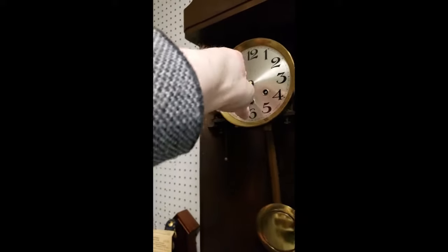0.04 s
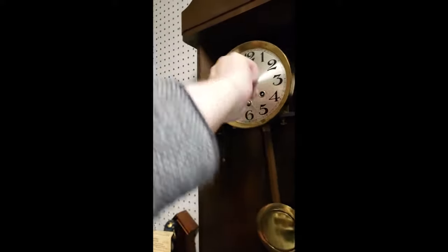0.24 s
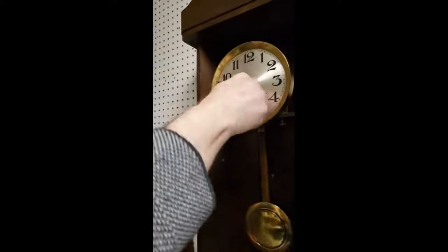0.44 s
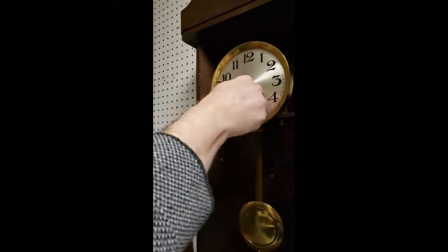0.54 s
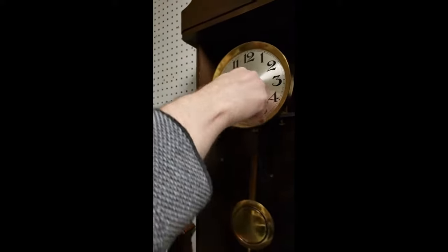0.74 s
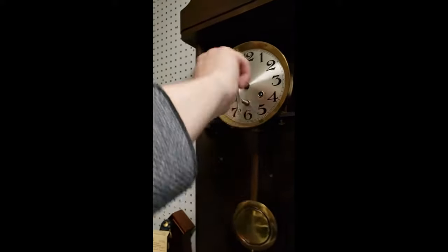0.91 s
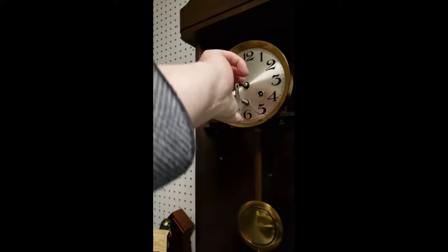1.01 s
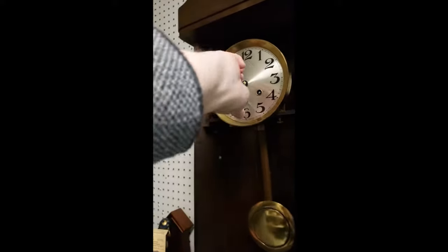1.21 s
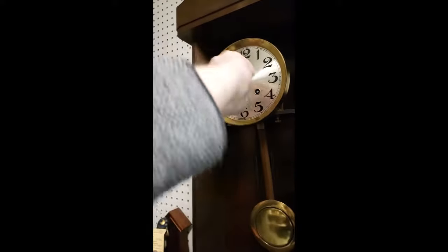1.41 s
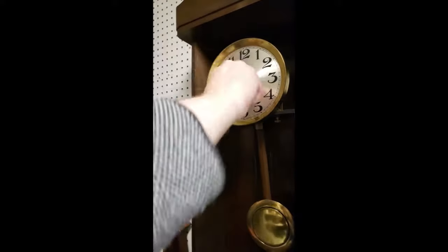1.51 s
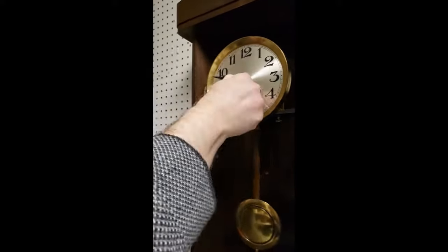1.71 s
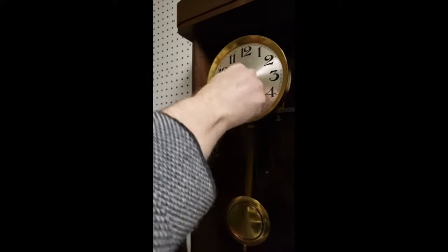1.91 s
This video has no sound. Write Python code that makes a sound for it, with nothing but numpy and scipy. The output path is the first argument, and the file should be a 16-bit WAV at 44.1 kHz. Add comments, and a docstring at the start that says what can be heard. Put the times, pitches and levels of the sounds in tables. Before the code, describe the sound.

Sharp, brassy ratchet clicks come in two quick runs as a key winds a wooden wall clock, nearby on the left in a quiet room. Light key ticks and knocks on the case fill the pause and follow the second turn.

```python
"""A wooden wall clock, to the left in a small quiet room, is wound with two turns of its key.
First the key ticks on its arbor; then the pawl snaps over the ratchet teeth, rattling the brass
movement and sounding the case. In the pause to change grip the key ticks, the spring's load knocks
on the case and the fingers rub round the key. The second turn follows with another run of snaps,
and ends in a few last ticks and knocks."""
import sys
import numpy as np
from scipy import signal
from scipy.fft import rfft, irfft
from scipy.io import wavfile

SR = 44100
rng = np.random.default_rng(int(sys.argv[2]) if len(sys.argv) > 2 else 0)


def materialize(psi):
    """Save the field psi as 16-bit PCM at rate SR to the path in sys.argv[1].

    A 1-D psi becomes a single channel; in a 2-D psi each row is a channel.
    """
    bounded = np.clip(np.atleast_2d(psi).T, -1, 1)
    quanta = np.round(bounded * 32767).astype(np.int16)
    wavfile.write(sys.argv[1], SR, quanta)


N = 85995
TIME = np.arange(N) / SR


def from_db(db):
    """Decibels as an amplitude ratio."""
    return 10 ** (np.asarray(db) / 20)


def unit_energy(x):
    """Normalisation: the squared samples sum to one."""
    return x / np.sqrt(np.sum(x ** 2) + 1e-20)


def at_hz(points, hz, column=1):
    """Interpolation of a table on a log-frequency axis."""
    points = np.array(points)
    return np.interp(np.log(np.maximum(hz, 1)), np.log(points[:, 0]), points[:, column])


def through(x, response):
    """Convolution: a linear system answers each sample with its impulse response."""
    return signal.fftconvolve(x, response)[:N]


def add(track, start_s, sound):
    """Superposition: a sound adds to the track from its start time."""
    start = max(int(start_s * SR), 0)
    track[start:start + len(sound)] += sound[:N - start]


def colour(points, size=4096):
    """Minimum-phase impulse response of unit energy with the given spectrum."""
    gain = from_db(at_hz(points, np.linspace(0, SR / 2, size // 2 + 1)))
    cepstrum = irfft(np.log(gain))
    return unit_energy(irfft(np.exp(rfft(2 * cepstrum[:size // 2], size))))


def ring(modes, scatter_db=0):
    """Free vibration: a sum of damped sinusoids, their levels scattered at random by scatter_db."""
    t = TIME[:SR // 2]
    out = 0
    for k, (hz, db, t60) in enumerate(modes):
        envelope = from_db(db + scatter_db * rng.normal() - 60 * t / t60)
        out += (-1) ** k * envelope * np.sin(2 * np.pi * hz * t)
    return out


def push(soft_s):
    """Force pulse of an impact: the longer the contact, the duller its spectrum."""
    force = TIME[:512] * np.exp(-TIME[:512] / soft_s)
    return force / force.sum()


def chatter(envelope, contacts_per_s=2500, grain_db=-0.5):
    """Tiny contacts of uneven strength merge into noise with the energy of the envelope."""
    size = len(envelope)
    strength = np.interp(TIME[:size] * contacts_per_s, np.arange(size), rng.standard_normal(size))
    burst = envelope * from_db(grain_db * strength) * rng.standard_normal(size)
    return unit_energy(burst) * np.sqrt(np.sum(envelope ** 2))


# Spectrum of the still room. Each row: frequency in Hz, relative level in dB.
AIR_SPECTRUM = [(25, -7.5), (42, -1), (60, 0.5), (85, -4), (120, 6.5), (170, -9.5), (330, -9.5),
                (540, -8.5), (800, -22), (1200, -33), (3000, -40.5), (8000, -47.5), (15500, -41.5)]

def air(level_db=-62.5, side_db=-8.5):
    """Ambient noise: low, steady and largely correlated between the two sides."""
    mid, side = (through(rng.standard_normal(N), colour(AIR_SPECTRUM)) for _ in range(2))
    return from_db(level_db) * (mid + from_db(side_db) * side * np.array([[1], [-1]]))


def diffuse(t60, build_s=0.0014):
    """Diffuse field: dense reflections build up, then decay exponentially."""
    t = TIME[:SR // 2]
    envelope = (1 - np.exp(-t / build_s)) * from_db(-60 * t / t60)
    return unit_energy(envelope * rng.standard_normal(len(t)))


# Reverberation of the clicks. Each row: frequency in Hz, left gain in dB, right gain in dB,
# T60 (time to fall by 60 dB) in seconds.
ROOM_BANDS = [(200, -17, -14.5, 0.73), (650, -10, -20, 0.21), (1680, -19.5, -18.5, 0.22),
              (2543, -13, -13.5, 0.25), (3500, -18.5, -19.5, 0.098), (5140, -10, -18, 0.24),
              (7100, -12, -21.5, 0.19), (8230, -19, -36, 0.21), (10600, -16.5, -20.5, 0.15),
              (12400, -10.5, -22, 0.22), (15200, -3, -22, .16)]

def room(channel):
    """Reverberation time depends on frequency: the lowest bands linger longest."""
    out, edges = 0, np.geomspace(150, 17000, 25)
    for low, high in zip(edges, edges[1:]):
        hz = np.sqrt(low * high)
        band = signal.butter(2, [low, high], "band", fs=SR, output="sos")
        tail = diffuse(t60=at_hz(ROOM_BANDS, hz, -1))
        out += from_db(at_hz(ROOM_BANDS, hz, 1 + channel)) * signal.sosfilt(band, tail)
    return out


# Paths of the clicks to the near and far side. Each row: frequency in Hz, relative gain in dB.
NEAR_PATH = [(150, -29.5), (600, -12), (1300, -24), (1750, -20.5), (2500, -11.5), (3500, -17.5), (4800, -7),
             (5900, -10.5), (7100, -3.5), (8300, -13.5), (10200, -9.5), (12500, -3.5), (15500, 4.5)]
FAR_PATH = [(150, -52), (600, 0.5), (1250, -14), (1700, -8.5), (2500, 0), (3500, -3.5), (4800, 2),
            (7200, -7.5), (8300, -59), (10200, -28), (12200, 6), (15500, 3.5)]

def metal_path(metal, channel, near_db=4.5, far_db=-18.5, far_lag_s=.0005):
    """Time and level differences: the clicks reach the left first and louder, then reverberate."""
    out = through(metal, room(channel))
    if channel == 0:
        near = through(metal, colour(NEAR_PATH))
        out += from_db(near_db) * near
        add(out, .0145, from_db(-14.5) * near)  # echo off the door
    else:
        add(out, far_lag_s, from_db(far_db) * through(metal, colour(FAR_PATH)))
    return out


def wood_path(wood, channel, wrap_hz=100, room_db=-10.5, far_db=-7, far_lag_s=.0003):
    """Diffraction: the case's bass wraps to both sides; the rest is later and weaker on the right."""
    out = signal.sosfilt(signal.butter(1, wrap_hz, fs=SR, output="sos"), wood)
    above_bass = wood - out
    reflections = from_db(room_db) * through(above_bass, diffuse(t60=.28))
    add(out, far_lag_s * channel, from_db(far_db * channel) * (above_bass + reflections))
    return out


# Modes of the wooden case. Each row: frequency in Hz, relative level in dB, T60 in seconds.
CASE_MODES = [(279.3, -15, 0.55), (374.7, -13.5, 0.18), (438, -12, .12), (512, 1, 0.14), (608, -3, 0.099),
              (708, -2.5, 0.093), (769.4, -2, 0.13), (943, -14, .05), (1110, -7, 0.1), (1265, 0, .07),
              (1339, -1.5, 0.09)]

def struck_case(centre_hz, width_octaves=0.92):
    """Modal excitation: a blow favours the modes near the centre of its spectrum."""
    modes = [(hz, db - 6 * (np.log2(hz / centre_hz) / width_octaves) ** 2, t60)
             for hz, db, t60 in CASE_MODES]
    return through(ring(modes, scatter_db=2.5), push(soft_s=0.0001))


# Spectrum of the rubbing force. Each row: frequency in Hz, relative level in dB.
FRICTION_SPECTRUM = [(200, -2), (400, 0), (520, 10.5), (760, -1), (950, -21), (2000, -35.5)]
# Fingers rubbing round the key. Each row: peak time in seconds, level in dB,
# time constant of rise and fall in seconds, hiss level in dB.
FINGER_RUBS = [(1.015, -39.5, 0.009, -67.5)]

def rubbing(direct_db=-5.5):
    """Forced vibration: friction of the fingers on the key drives the case's modes."""
    out = np.zeros(N)
    for peak_s, db, swell_s, _ in FINGER_RUBS:
        swell = np.exp(-np.abs(TIME - peak_s) / swell_s)
        force = unit_energy(through(swell * rng.standard_normal(N), colour(FRICTION_SPECTRUM)))
        rub = unit_energy(through(force, ring(CASE_MODES))) + from_db(direct_db) * force
        out += from_db(db) * unit_energy(rub) * np.sqrt(np.sum(swell ** 2))
    return out


def skin_hiss(swell_s=0.043):
    """Friction noise: skin sliding on the key hisses faintly."""
    return sum(from_db(hiss_db) * np.exp(-np.abs(TIME - peak_s) / swell_s) * rng.standard_normal(N)
               for peak_s, _, _, hiss_db in FINGER_RUBS)


# Modes of the case rocking on the wall. Each row: frequency in Hz, relative level in dB, T60 in seconds.
ROCKING_MODES = [(64.4, -16.5, .4), (105.5, -12.5, 0.1), (157.4, -1.5, 0.19), (234.4, -3.5, .18),
                 (272, -5.5, 0.45)]
# Spectrum of a knock's dry crunch. Each row: frequency in Hz, relative level in dB.
CRUNCH_SPECTRUM = [(120, -15.5), (300, -5.5), (750, 4.5), (1000, -3.5), (1300, 0), (2200, -8), (3500, -28),
                   (8000, -45.5)]
# Knocks on the case. Each row: start in seconds, level in dB, centre of the blow in Hz,
# thud level in dB, crunch level in dB.
LOAD_KNOCKS = [(.110, -49, 624, -68, -71), (.320, -27.5, 900, -40, -24), (.334, -35, 670, -40, -29),
               (.709, -35.5, 430, -45, -39.5), (.722, -42.5, 465, -65, -50), (.752, -51.5, 300, -45.5, -61),
               (1.495, -35.5, 820, -55.5, -37.5), (1.509, -41, 820, -60, -33),
               (1.889, -42, 530, -43, -47.5), (1.903, -41, 398, -44, -44.5)]

def knocks(crunch_s=0.0053):
    """Impact excitation: the spring's load rings the case and rocks it, with a dry crunch."""
    out, t = np.zeros(N), TIME[:SR // 10]
    for start_s, db, centre_hz, thud_db, crunch_db in LOAD_KNOCKS:
        add(out, start_s, from_db(db) * struck_case(centre_hz))
        thud = through(ring(ROCKING_MODES, scatter_db=4.0), push(soft_s=0.00074))
        add(out, start_s, from_db(thud_db) * thud)
        crunch = through(chatter(np.exp(-t / crunch_s)), colour(CRUNCH_SPECTRUM))
        add(out, start_s, from_db(crunch_db) * crunch)
    return out


# Modes of the movement's plates. Each row: frequency in Hz, relative level in dB, T60 in seconds.
PLATE_MODES = [(1102.4, 0, .09), (1210, 0, 0.054), (1680, -3.5, 0.028), (2083, -6.5, 0.035),
               (2360, -7, 0.028), (3120, 1, 0.005)]
# The key shifting on its arbor. Each row: start in seconds, level in dB, decay constant in seconds,
# low-pass cutoff in Hz, clank level in dB.
ARBOR_TICKS = [(.001, -52.5, 0.016, 6800, -43), (0.1066, -52.5, 0.018, 5150, -58),
               (0.1573, -44, 0.0082, 9350, -48), (0.1782, -50.5, 0.019, 7000, -46.5),
               (0.614, -38, 0.019, 4000, -43), (0.6548, -27, 0.0046, 7050, -48),
               (.681, -33, 0.013, 7000, -47.5), (.690, -43, .005, 7000, -52),
               (.7044, -31, 0.0075, 5040, -37), (1.1917, -51.5, 0.023, 7020, -44.5),
               (1.3733, -40.5, .007, 3060, -59), (1.3876, -42.5, 0.019, 3500, -70),
               (1.8186, -40, 0.02, 4000, -40), (1.8475, -39.5, 0.0048, 12100, -63),
               (1.859, -42.5, 0.011, 4000, -54), (1.8858, -26.5, 0.0043, 7300, -35)]
# The fingers letting go of the key. Each row: start in seconds, level in dB.
RELEASE_PINGS = [(.001, -70), (1.19, -56.5)]

def key(ring_hz=14830, ring_t60_s=.28):
    """Mechanical coupling: the key's ticks clank in the plates; let go, it vibrates freely."""
    out, t = np.zeros(N), TIME[:SR // 5]
    for start_s, db, decay_s, cutoff_hz, clank_db in ARBOR_TICKS:
        lowpass = signal.butter(1, cutoff_hz, fs=SR, output="sos")
        tick = chatter(np.exp(-t / decay_s))
        add(out, start_s, from_db(db) * signal.sosfilt(lowpass, tick))
        add(out, start_s, from_db(clank_db) * through(tick, unit_energy(ring(PLATE_MODES))))
    for start_s, db in RELEASE_PINGS:
        add(out, start_s, ring([(ring_hz, db, ring_t60_s)]))
    return out


# Modes of the brass movement. Each row: frequency in Hz, gain in dB, T60 in seconds.
BRASS_MODES = [(2566, -58.5, 0.011), (4750, -56, 0.03), (5060, -47, 0.041), (6880, -56, .09),
               (7280, -54, .08), (11559, -63, .12), (13700, -55.5, .12), (14400, -55.5, 0.14),
               (15520, -54, .09)]

def movement(contacts):
    """Resonance: the brass adds its ringing to the contacts that drive it."""
    return contacts + through(contacts, ring(BRASS_MODES))


# The pawl dropping off each tooth. Each row: start in seconds, level in dB, treble gain in dB, delay of
# the hardest strike in seconds, time until the chatter decays in seconds, level in the case in dB.
PAWL_SNAPS = [(.2095, -21.5, 3, 0.0004, 0.0056, -46), (.2490, -16.5, 2, 0.0053, .0052, -40.5),
              (.2812, -14.5, 0, 0.0042, 0.0063, -41), (.3143, -14.5, 1, 0.0045, 0.0054, -33.5),
              (.3521, -15.5, 0.5, 0.0032, 0.0052, -39.5), (.3902, -13, -1.5, 0.0036, .0044, -36.5),
              (.4242, -14.5, 0, 0.0042, 0.0058, -37.5), (.4615, -15, 2, 0.0028, 0.0052, -36),
              (.5125, -13.5, -3.5, 0.0045, 0.0064, -39), (1.4220, -14.5, 0, 0.0016, 0.0049, -39.5),
              (1.4628, -13.5, -1, .0034, 0.0067, -41.5), (1.4925, -15, 1, 0.0052, 0.0054, -34),
              (1.5266, -13.5, 1.5, 0.0011, 0.0033, -33.5), (1.5638, -20.5, 5, 0.0036, 0.0063, -39),
              (1.6002, -13, -2.5, 0.0036, 0.004, -37), (1.6346, -18.5, 4, 0.0027, 0.0051, -39),
              (1.6784, -17.5, -0.5, 0.0053, 0.0054, -44)]

def pawl(rise_s=0.00057, fall_s=.003, strike_db=-8, strike_s=0.00036):
    """Contact chatter: each snap rattles for a few milliseconds round one hard strike."""
    out, t = np.zeros(N), TIME[:SR // 20]
    highpass = signal.butter(1, 3000, "high", fs=SR, output="sos")
    for start_s, db, treble_db, delay_s, hold_s, _ in PAWL_SNAPS:
        envelope = np.minimum(t / rise_s, 1) * np.exp(-np.maximum(t - hold_s, 0) / fall_s)
        strike = from_db(strike_db) * np.exp(-np.abs(t - delay_s) / strike_s)
        snap = chatter(envelope + strike)
        treble_shelf = (from_db(treble_db) - 1) * signal.sosfilt(highpass, snap)
        add(out, start_s, from_db(db) * (snap + treble_shelf))
    return out


def pawl_in_case():
    """Structure-borne sound: each snap also rings the wood."""
    out = np.zeros(N)
    for start_s, *_, case_db in PAWL_SNAPS:
        add(out, start_s, from_db(case_db) * struck_case(centre_hz=780))
    return out


def scene():
    """Superposition: metal and wood, direct and reverberant, add to the ambient noise."""
    metal = movement(pawl() + key() + skin_hiss())
    wood = pawl_in_case() + knocks() + rubbing()
    out = air()
    for channel in range(2):
        out[channel] += metal_path(metal, channel) + wood_path(wood, channel)
    return out


def record(dry, cutoff_hz=15850):
    """Band limiting: an elliptic low-pass cuts the top steeply."""
    return signal.sosfilt(signal.ellip(10, .3, 70, cutoff_hz, fs=SR, output="sos"), dry)


dry = scene()
out = record(dry)
materialize(out)
```